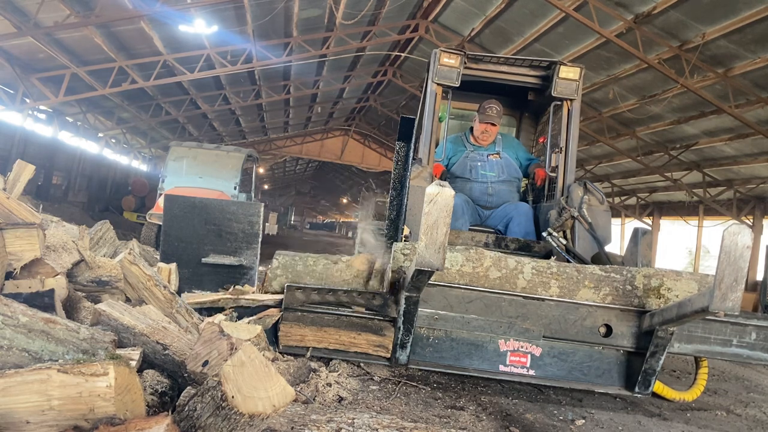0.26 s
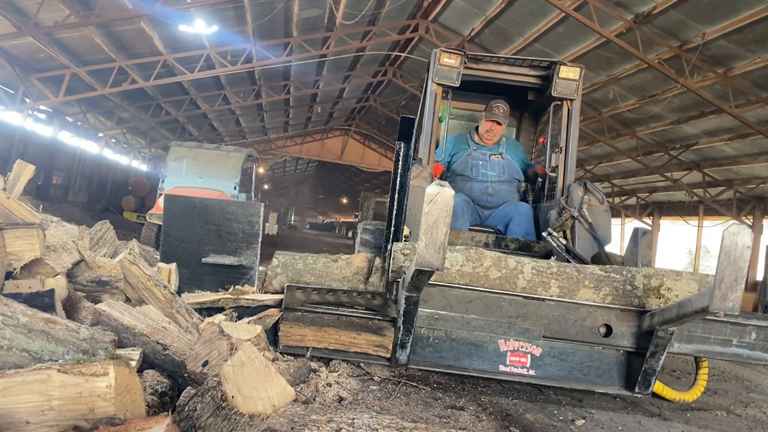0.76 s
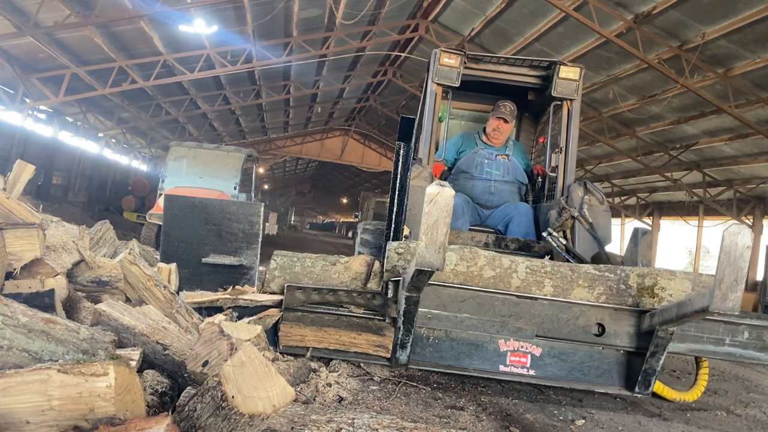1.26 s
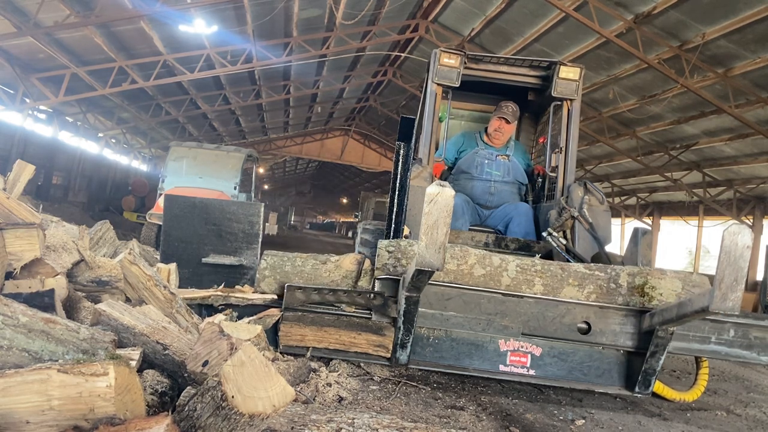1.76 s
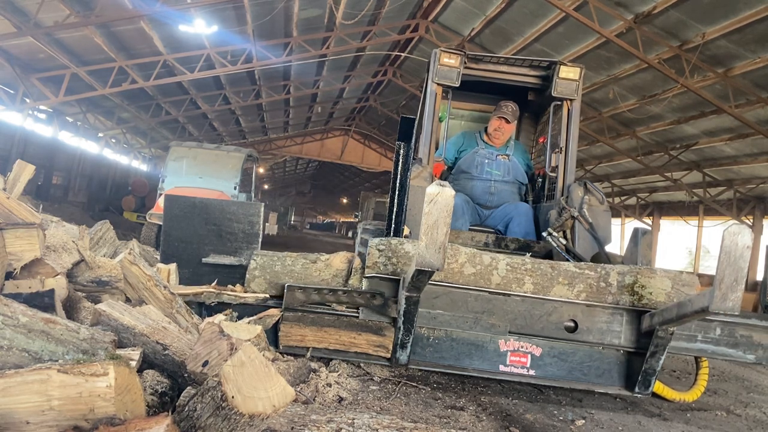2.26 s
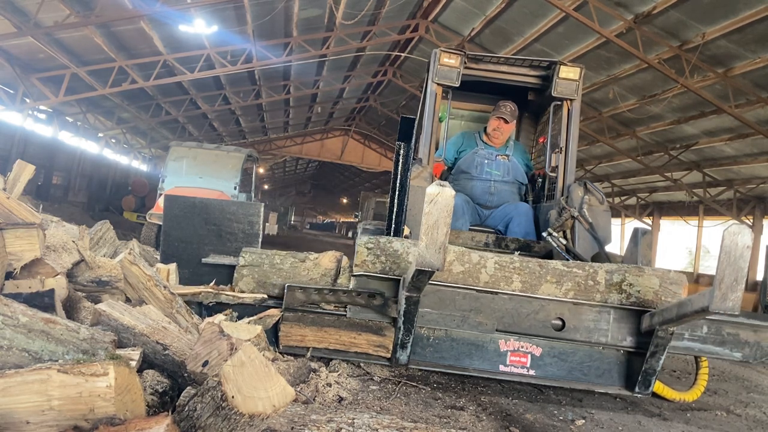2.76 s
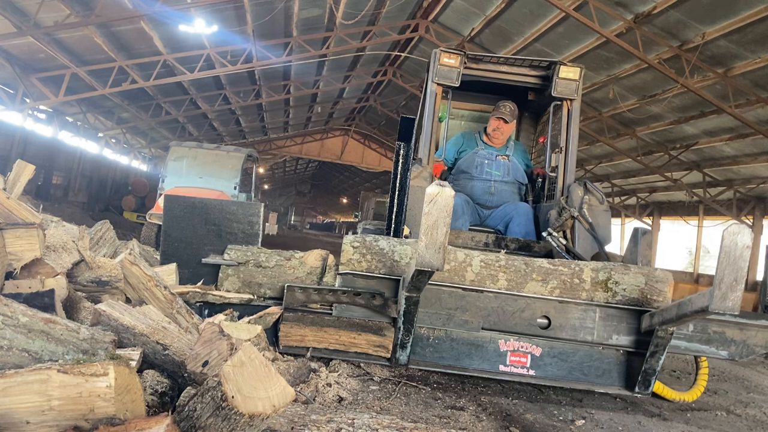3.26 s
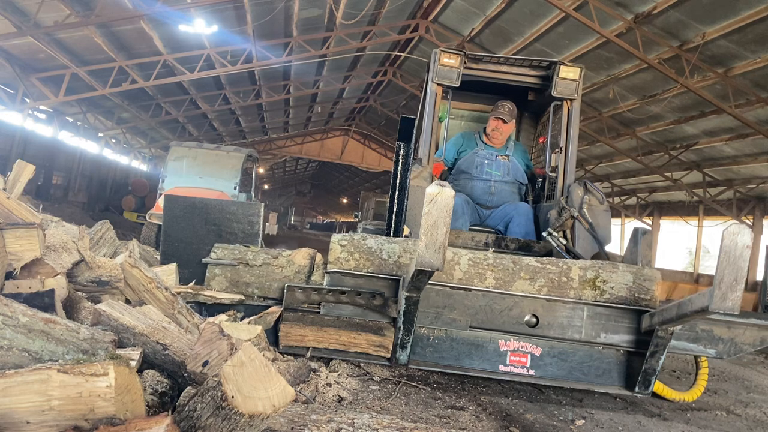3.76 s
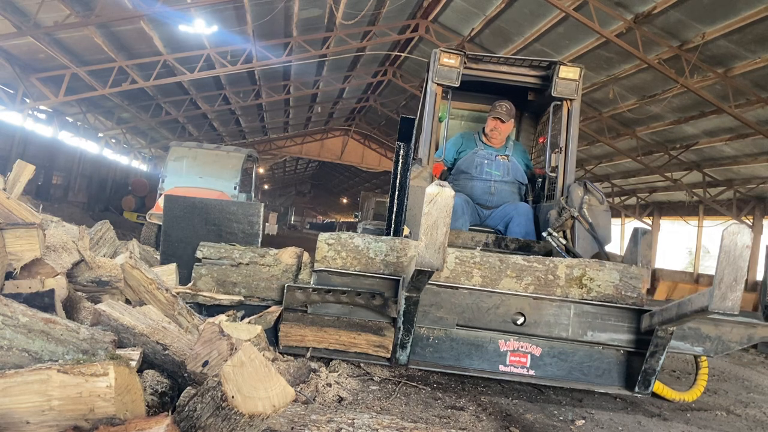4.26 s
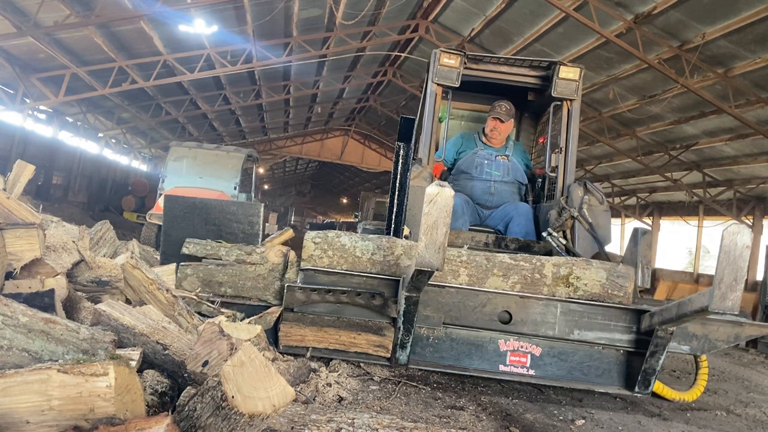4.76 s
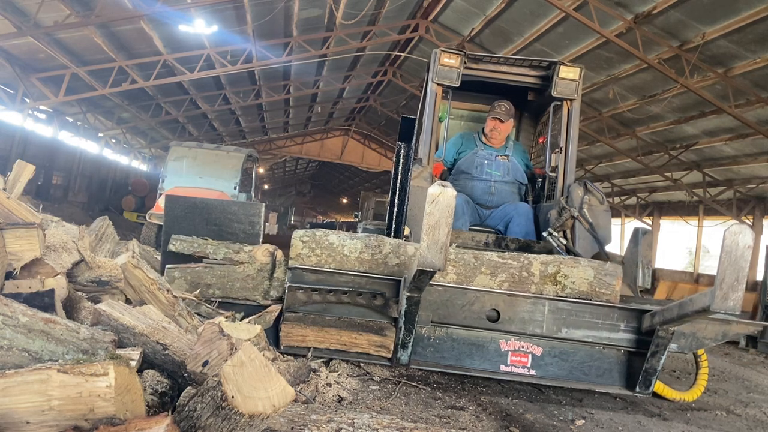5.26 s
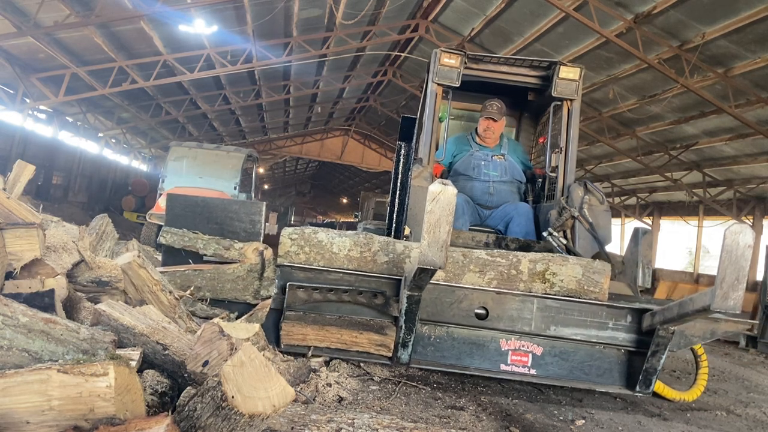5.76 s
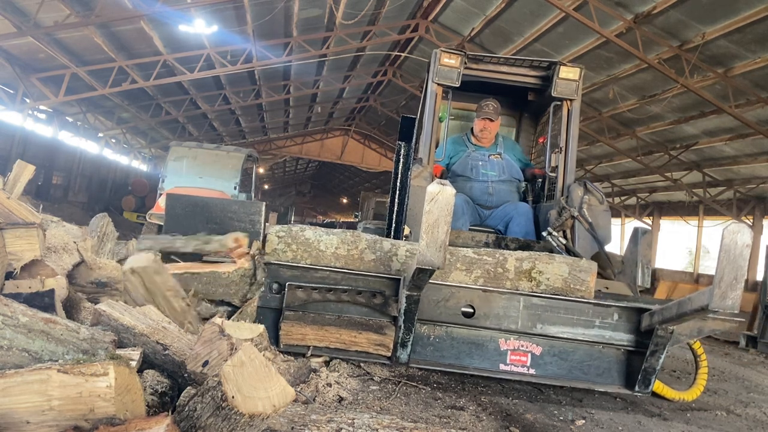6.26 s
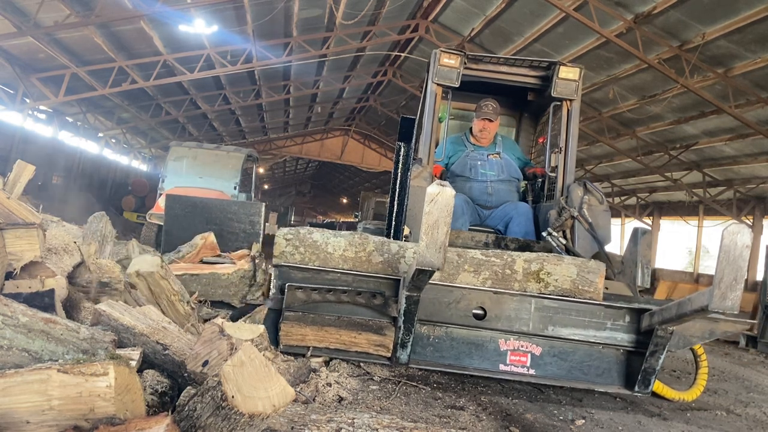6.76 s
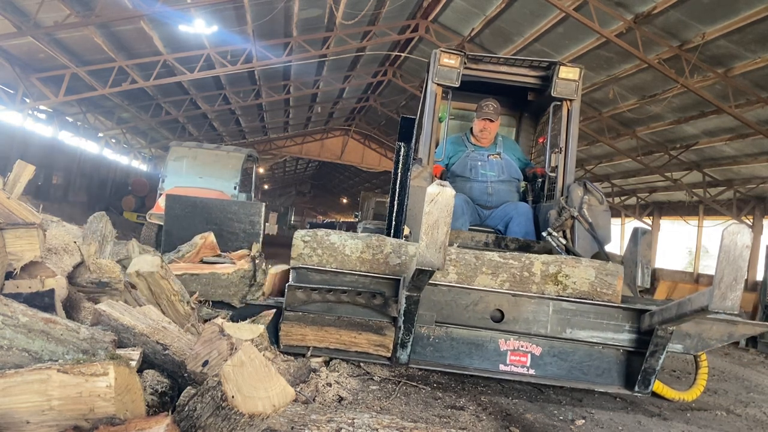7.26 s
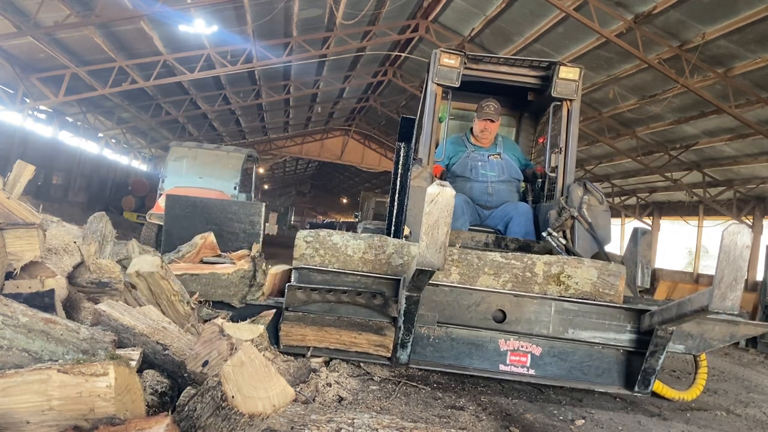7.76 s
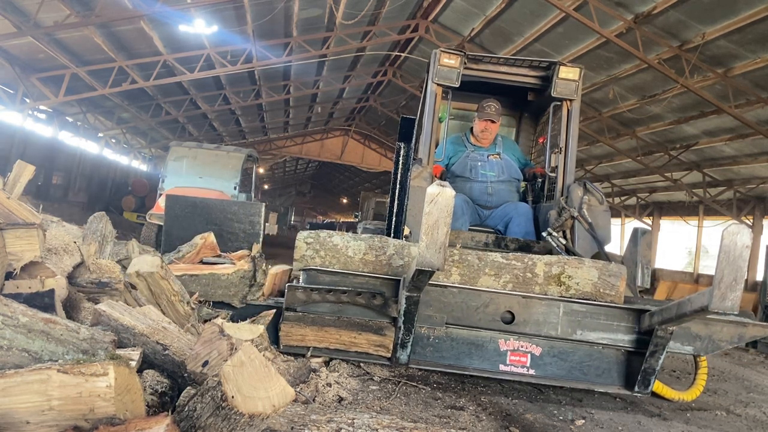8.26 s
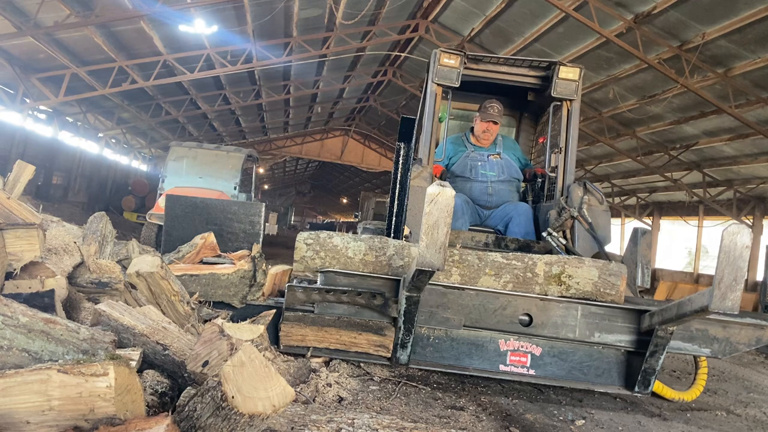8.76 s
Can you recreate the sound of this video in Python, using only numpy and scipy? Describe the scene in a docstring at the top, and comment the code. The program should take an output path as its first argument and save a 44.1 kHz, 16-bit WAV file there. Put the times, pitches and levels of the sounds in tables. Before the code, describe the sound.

A throbbing engine with faint hydraulic whine fills a metal-roofed shed. First a saw spins down with a hissing rasp; next, irregular ripping cracks, oil hiss and grinding bark accompany a splitting log. Blocks land hard. A log slides with metallic friction, followed by a cluster of hollow wooden knocks and, late on, a few more thumps. The stereo pickup is near the machine, with brief slap echoes.

```python
"""Wood splits with sharp cracks and its pieces tumble onto a pile, over a droning diesel loader in a steel shed.
At the start a saw runs down; later a log slides along a steel bed, while oil hisses and bark grinds.
The engine is a stack of tones locked to its firing, plus whines and a throbbing roar; hiss, grind and
slide are coloured noise; struck wood is short blows ringing through fast-dying modes. Shed echoes,
differences between the two stereo channels and a gain control shape the result."""
import sys
import numpy as np
from scipy import signal
from scipy.fft import rfft, irfft, next_fast_len
from scipy.io import wavfile
from scipy.ndimage import uniform_filter1d

SR = 44100
rng = np.random.default_rng(int(sys.argv[2]) if len(sys.argv) > 2 else 0)


def master_out(mix):
    """Clip the mix to full scale and print it as 16-bit PCM to the path in sys.argv[1]."""
    frames = np.transpose(np.atleast_2d(mix))
    ceiling = np.clip(frames, -1, 1)
    pcm = np.round(ceiling * 32767).astype(np.int16)
    wavfile.write(sys.argv[1], SR, pcm)


N = 397341

# how alike left and right are: f/Hz, likeness (1 = identical)
LIKENESS = [(60, 0.47), (130, 1), (290, 0.48), (640, 0.021), (1400, 0.17), (3100, 0.58), (6000, 0.28),
            (7400, 0.95), (16000, 1)]
# spells of work on the wood: full level from t/s, length/s, hiss level/dB, hiss tilt/(dB per octave),
# grind level/dB, grind weight/(dB per octave below 1 kHz)
WORK = [(0.808, 0.0084, -38.5, 7, -33, -1), (1.005, 0.14, -50, 22, -30, 12),
        (1.991, 0.22, -33.5, 6, -24.5, -0.5), (2.498, 0.084, -42, 4, -29.5, -2),
        (2.63, 0.23, -33, 4.5, -25, 4), (3.095, 0.27, -39, 1, -42, -9), (3.415, 0.13, -33, 3.5, -29, 6),
        (3.7, 0.17, -30.5, 1, -29, -12), (3.955, 0.38, -35, -1.5, -39, 6),
        (4.492, 0.086, -42.5, 5, -33.5, 16), (5.38, 0.52, -42, 4.5, -36, 19.5),
        (5.76, 0.37, -37.5, 3, -30, -2), (6.208, 0.3, -37.5, -0.5, -23, 0.5),
        (7.366, 0.52, -49, 14.5, -39.5, -5), (7.903, 0.2, -44, 1, -33, -1)]
# the saw before it surges and slows: hiss level/dB, hiss tilt/(dB per octave),
# grind level/dB, grind weight/(dB per octave below 1 kHz)
SAW = (-24.5, 2, -28.5, -14)
WORK_RISE_S, WORK_FALL_DB_PER_S = 0.013, 104.5
SAW_STOPS_S = .47
BLOW_SAMPLES = 4000  # length of the sound of one crack or landing


def amp(db):
    """Turn decibels into a plain factor."""
    return 10 ** (np.asarray(db) / 20)


def evened(x):
    """Scale a sound to rms 1."""
    return x / np.sqrt(np.mean(x ** 2) + 1e-20)


def levelled(x):
    """Scale a sound to rms 1 over its first 12 ms."""
    return x / np.sqrt(np.mean(x[:round(.012 * SR)] ** 2))


def read(points, hz):
    """Read a curve between its points, on a logarithmic pitch scale."""
    f, value = np.transpose(points)
    return np.interp(np.log(hz + 1), np.log(f + 1), value)


def curves(rows, t):
    """Join the points of each column with straight lines in time."""
    s, *columns = np.transpose(rows)
    return [np.interp(t, s, column) for column in columns]


def slowly(control):
    """Work out a control every 64 samples and join the points up."""
    t = np.arange(0, N + 64, 64) / SR
    return np.interp(np.arange(N) / SR, t, control(t))


def wander(fastest_hz, count):
    """Slow random tracks: noise of rms 1 with everything faster than the limit removed."""
    points = N // 64 + 2
    spectrum = rfft(rng.standard_normal((count, points)))
    spectrum[:, np.fft.rfftfreq(points, 64 / SR) > fastest_hz] = 0
    slow = irfft(spectrum, points)
    return [np.interp(np.arange(N) / 64, np.arange(len(row)), evened(row)) for row in slow]


def pair(left, other, hz):
    """Mix two independent spectra into a left and right as alike as the likeness curve says."""
    same = np.clip(read(LIKENESS, hz), -1, 1)
    return np.array([left, same * left + np.sqrt(1 - same ** 2) * other])


def noise(size, db_at, patchy_db):
    """Two-channel noise built frame by frame; db_at(Hz, s) sets its colour and random patches roughen it."""
    hop = size // 4
    frames, hz = N // hop + 5, np.fft.rfftfreq(size, 1 / SR)[:, None]
    a, b, c, d, patches = rng.standard_normal((frames, len(hz), 5)).T
    patches = uniform_filter1d(patches, size=size // 64, axis=0)
    patches = evened(uniform_filter1d(patches, size=8, axis=1))
    z = pair(a + 1j * b, c + 1j * d, hz)
    z *= amp(db_at(hz, np.arange(frames) * hop / SR) + patchy_db * patches)
    return signal.istft(z, nperseg=size, noverlap=size - hop)[1][:, :N]


def resonance(hz, f, width):
    """Bell-shaped peak of height 1 around one pitch."""
    return 1 / (1 + ((hz - f) / width) ** 2)


def band(low_hz, high_hz, x):
    """Keep only the sound between two pitches."""
    return signal.sosfilt(signal.butter(2, [low_hz, high_hz], "band", fs=SR, output="sos"), x)


def add(mix, s, sound):
    """Place a sound in the mix at a time in seconds."""
    part = mix[round(s * SR):][:len(sound)]
    part += sound[:len(part)]


def spell(t, start, length, rise_s, fall_db_per_s):
    """Gain that rises to full by its start time, holds, and then dies away."""
    rise = np.clip((t - start) / rise_s + 1, 0, 1)
    return rise * amp(-fall_db_per_s * np.maximum(t - start - length, 0))


def sawing(t):
    """Gain of the saw: it bites in slow surges as it slows, then dies away quickly."""
    surge_db = 2 * np.cos(2 * np.pi * 3.7 * (t - 0.04))  # 3.7 surges a second, one peaking at 0.04 s
    slowing_db = 8 * t
    dying_db = 50 * np.maximum(t - SAW_STOPS_S, 0)
    return amp(surge_db - slowing_db - dying_db)


def effort(t, column):
    """Level in dB and tilt of hiss (column 0) or grind (column 2): powers add, the loudest part sets the tilt."""
    # between spells: hiss level/dB, hiss tilt/(dB per octave), grind level/dB, grind weight/(dB per octave)
    idle = (-45, -2, -34, 0.5)
    parts = [(np.ones(len(t)), idle), (sawing(t), SAW)]
    for s, length, *row in WORK:
        parts.append((spell(t, s, length, WORK_RISE_S, WORK_FALL_DB_PER_S), row))
    power = np.array([(gain * amp(row[column])) ** 2 for gain, row in parts])
    tilt = [row[column + 1] for _, row in parts] @ power / power.sum(0)
    return 10 * np.log10(power.sum(0)), tilt


def exhaust(angle, t):
    """Exhaust and block: tones at multiples of the firing rate, meeting in one sharp pressure dip per firing."""
    # exhaust loudness: t/s, level/dB
    loudness = [(0.0, -14.5), (0.63, -12), (0.9, -10.5), (1.13, -12.5), (1.4, -8.5), (5.9, -9),
                (6.27, -13.5), (6.73, -8.5), (7.43, -8.5), (7.55, -10.5), (8.05, -11), (8.23, -11),
                (8.48, -12), (9.01, -8)]
    # tones: multiple of the firing rate, level/dB, wavering/dB
    multiples = [(.75, -41, -11.5), (1, -0.5, -0.5), (2, -10.5, 0.5), (2.75, -37, 1.5), (3, -37.5, 5),
                 (3.25, -19.5, 1.0), (4, -33.5, 7.5), (5.25, -37.5, -0.5), (6.25, -39, 8)]
    tones = 0
    for (k, db, waver_db), w in zip(multiples, wander(13, count=len(multiples))):
        tones = tones - amp(db + waver_db * w) * np.cos(k * (angle - .1) + 0.032)
    return amp(curves(loudness, t)[0]) * tones


def pumps(angle, t):
    """Pumps: two whines locked to the engine speed, which swell under strain."""
    # strain: full level from t/s, length/s, whine level/dB, upper whine level/dB
    strains = [(0, 0.53, -35.5, -42.5), (1.52, 0.17, -36, -36), (4.65, 0.89, -42, -41.5),
               (5.953, 0.42, -35, -50), (7.525, 0.6, -30, -38)]
    whine, upper = amp(-40.5), 0  # the lower whine is always there
    for s, length, db, upper_db in strains:
        gain = spell(t, s, length, rise_s=0.037, fall_db_per_s=63)
        whine = whine + gain * amp(db)
        upper = upper + gain * amp(upper_db)
    waver = amp(2.6 * wander(13, count=1)[0])
    # 6.5 and 9 cycles per firing
    return whine * waver * np.sin(6.5 * angle) + upper * np.sin(9.0 * angle)


def panels(t):
    """Sheet panels: steady low drones, each wavering in level."""
    # drones: f/Hz, level/dB
    drones = [(300, -38.5), (386, -39.5)]
    tracks = wander(9, count=len(drones))
    return sum(amp(db + 2.9 * w) * np.sin(2 * np.pi * f * t) for (f, db), w in zip(drones, tracks))


def engine():
    """Engine in the shed: exhaust tones, pump whines, droning panels, and a roar that throbs with each firing."""
    # engine speed, sagging under load: t/s, firing rate f/Hz
    speed = [(0, 74.1), (0.55, 74.7), (0.72, 76.9), (0.87, 77.2), (1.1, 73.8), (1.25, 77.4), (1.55, 79.4),
             (2.1, 78.4), (5.5, 78.6), (5.75, 77.7), (6.15, 75.0), (6.3, 75.0), (6.75, 77.9), (7.3, 78.1),
             (7.45, 77.0), (7.6, 73.0), (8.02, 72.9), (8.3, 77.1), (8.75, 78.1), (9.01, 77.9)]
    # colour of the engine noise in the shed: f/Hz, level/dB
    roar_colour = [(20, -20), (45, -37), (86, -2.5), (123, -6), (168, -11.5), (204, -3), (255, -8),
                   (345, -12.5), (434, -13.5), (1100, -21.5), (2000, -36), (4670, -46), (8000, -45),
                   (12000, -59.5), (16000, -100)]
    t = np.arange(N) / SR
    angle = 2 * np.pi * np.cumsum(curves(speed, t)[0]) / SR  # one turn per firing
    whines = pumps(angle, t) + panels(t)
    roar = evened(noise(2048, lambda f, s: read(roar_colour, f), patchy_db=1.5))
    throb = 1 + 0.069 * np.cos(angle - 1.5)
    tonal = exhaust(angle, t) + whines * amp([[1.5], [-3]])  # whines lean to the left
    return np.sqrt(2) * tonal + amp(-22.5) * throb * roar


def hiss():
    """Oil through valves, and the saw: broad noise with fuzzy whistles, sputtering across the whole band."""
    # colour of the hiss: f/Hz, level/dB
    base = [(300, -32), (1000, -23), (2200, 7.5), (3000, 3.5), (5000, 3), (8000, -0.5), (12000, -8),
            (16000, -17.5)]
    # whistles: f/Hz, width/Hz, height/dB
    whistles = [(3600, 800, 4), (6500, 200, 4)]
    # colour added while the saw runs down: f/Hz, width/Hz, height/dB
    saw_bar = [(2070, 290, -12), (3440, 1300, 2.5), (5870, 170, -1.5), (6570, 370, 0)]

    def colour(hz, s):
        whistle_db = sum(db * resonance(hz, f, width) for f, width, db in whistles)
        saw_db = sum(db * resonance(hz, f, width) for f, width, db in saw_bar)
        tilt_db = effort(s, column=0)[1] * np.log2((hz + 1) / 4000)
        return read(base, hz) + whistle_db + (s < SAW_STOPS_S + .3) * saw_db + tilt_db

    level_db = slowly(lambda t: effort(t, column=0)[0])
    sputter_db = 1.1 * wander(83, count=1)[0]
    return amp(level_db + sputter_db) * evened(noise(512, colour, patchy_db=1.5))


def grind():
    """Bark dragged and crushed: lumpy mid-range noise, its low end varying with the work."""
    # colour of the grind: f/Hz, level/dB
    base = [(150, -22.5), (400, 5.5), (900, 0), (1400, -2), (2200, -6), (5000, -13), (10000, -52)]

    def colour(hz, s):
        return read(base, hz) + effort(s, column=2)[1] * np.log2(1000 / np.clip(hz, 300, 1000))

    level_db = slowly(lambda t: effort(t, column=2)[0])
    lumps_db = 1.55 * wander(29, count=1)[0]
    return amp(level_db + lumps_db) * evened(noise(512, colour, patchy_db=2.0))


def slide():
    """The log sliding on steel: friction noise through the bed's resonances, each drifting and wavering."""
    # bed resonances: f/Hz, width/Hz, level/dB, drift/(share of pitch per s),
    # last climb/(share of pitch per s), last swell/(dB per s)
    bed = [(1200, 110, 4, 0, .03, 75), (2550, 130, -3, -.03, 0, 0), (3330, 170, 2, -.12, 0, 15),
           (4100, 150, -4, -.03, .9, 35), (6300, 90, -10, 0, .4, 0), (7800, 150, -13, 0, .4, 0),
           (10500, 180, -17, 0, .4, 0)]
    start_s, end_s = 5.35, 6.23
    climb_from_s = 6.05  # the pitches climb as the log leaves the bed
    t, wavering = np.arange(N) / SR, wander(4.9, count=2 * len(bed))

    def colour(hz, s):
        since = np.clip(s - start_s, 0, end_s - start_s)
        last = np.clip(s - climb_from_s, 0, end_s - climb_from_s)
        w = [np.interp(s, t, row) for row in wavering]
        total = 0
        for k, (f, width, db, drift, climb, swell_db) in enumerate(bed):
            pitch = f * (1 + drift * since + climb * last + .018 * w[2 * k + 1])
            level = amp(db + swell_db * last + 1.5 * w[2 * k])
            total = total + level * resonance(hz, pitch, width)
        return 20 * np.log10(total)

    stroke = spell(t, start_s, end_s - start_s, rise_s=0.035, fall_db_per_s=302)
    z = noise(1024, colour, patchy_db=2.2) * stroke
    z = z / np.sqrt((z ** 2).sum() / (2 * stroke ** 2).sum())  # rms 1 during the stroke
    return amp(-32 + 2 * (t - start_s)) * z  # grows 2 dB per s


def ring(hz, blow, slower, sag=0):
    """Wood's modes driven by an uneven blow and dying fast; sag lets the pitch sink. Peak 1."""
    # modes: multiple of the pitch, level/dB, time to fall 60 dB/s (before "slower" stretches it)
    modes = [(1, 0, .014), (1.22, -9, .008), (.75, -8, .01), (2.6, -13, .004)]
    t = np.arange(len(blow)) / SR
    # a sagging pitch starts high and sinks with an 18 ms time constant
    turns = np.cumsum(hz * (1 + sag * (np.exp(-t / .018) - .5))) / SR
    sound = 0
    for k, db, t60 in modes:
        turn = np.exp(2j * np.pi * k * turns)
        keep = amp(-60 / (slower * t60 * SR))  # share left after each sample
        sound = sound + amp(db) * (turn * signal.lfilter([1], [1, -keep], blow / turn)).imag
    return sound / abs(sound).max()


def scatter(gain, per_s, hz_range, spread_db, slower):
    """Small pieces struck at random: 12 sizes, each with its own pitch."""
    loudness = amp(spread_db * np.minimum(rng.exponential(1, N), 4))
    sizes = gain * loudness * (rng.random(N) < per_s / SR)
    piece = rng.integers(0, 12, N)
    blows = rng.standard_normal((12, 1000)) * amp(-60 * np.arange(1000) / SR / .01)
    out = np.zeros(N)
    for k, hz in enumerate(np.geomspace(*hz_range, 12)):
        sound = ring(hz, blows[k], slower)
        for at in np.flatnonzero(sizes * (piece == k) > 1e-4):
            add(out, at / SR, sizes[at] * sound)
    return out


def sharp_strike():
    """One single-sample strike after 1 ms, 22 dB above the rms of the raw noise it joins."""
    return amp(22) * (np.arange(BLOW_SAMPLES) == round(.001 * SR))


def landings():
    """Pieces landing on the pile: dull, longer blows; low-pitched pieces ring longer."""
    # landings: t/s, peak level/dB, f/Hz
    thumps = [(0.849, -17, 600), (1, -18, 230), (1.005, -25, 585), (1.046, -19, 1190), (1.089, -13, 232),
              (1.12, -23, 1160), (2.185, -8, 794), (2.727, -7, 245), (4.167, -4.5, 615), (4.178, -9, 494),
              (4.189, -18, 560), (4.209, -12.5, 520), (4.227, -12, 537), (4.297, -2.5, 890),
              (4.298, -2, 504), (6.059, -3, 140), (6.072, -24, 300), (6.267, -4.5, 324), (6.315, -9, 323),
              (6.224, -27, 500), (6.288, -5, 473), (6.268, -16, 830), (6.352, -3.5, 770),
              (6.385, -6.5, 330), (6.464, -7, 860), (6.515, -12, 610), (6.572, -8, 320), (6.345, -10, 328),
              (6.44, -14, 413), (6.49, -5.5, 330), (6.468, -4, 326), (6.514, -6, 347), (7.938, -2.5, 223),
              (8.073, -5, 400), (8.084, -4.5, 740), (8.098, -6, 446)]
    out, t = np.zeros(N), np.arange(BLOW_SAMPLES) / SR
    for s, db, hz in thumps:
        blow = rng.standard_normal(BLOW_SAMPLES) * amp(-60 * t / 0.079) + sharp_strike()
        add(out, s, amp(db) * ring(hz, blow, slower=max(1100 / hz, 1)))
    return out


def clatter():
    """Pieces clattering down the pile: random knocks at many pitches."""
    # tumbles: full level from t/s, length/s, level/dB
    tumbles = [(1.0, .12, -33), (6.24, .31, -24), (8.07, .08, -27)]
    falling = slowly(lambda u: sum(
        spell(u, s, length, WORK_RISE_S, 200) * amp(db) for s, length, db in tumbles))
    return scatter(falling, per_s=300, hz_range=(310, 1350), spread_db=2.6, slower=1.5)


def splinters():
    """Small random snaps while wood is worked or sawn, following the level of the hiss."""
    def working(u):
        total = amp(SAW[0] - 12) * sawing(u)  # the saw's chips are fainter
        for s, length, db, *_ in WORK:
            total = total + spell(u, s, length, WORK_RISE_S, WORK_FALL_DB_PER_S) * amp(db)
        return total

    return scatter(slowly(working) * amp(5), per_s=260, hz_range=(1100, 3900), spread_db=2.3, slower=0.88)


def cracks():
    """Fibres snapping: a burst of tearing noise and the ringing log, its pitch sinking as the split opens."""
    # cracks: t/s, snap peak level/dB, ring level/dB, ring f/Hz, top-end level/dB
    snaps = [(0.812, -17, -27.5, 1410, -30), (0.995, -20.5, -23.5, 905, -42), (0.999, -24, -34, 1520, -52),
             (1.076, -16.5, -37, 1640, -47), (1.11, -17.5, -28, 1180, -52), (1.9927, -19, -43, 1070, -42),
             (2.001, -19, -37, 1100, -32), (2.048, -29, -23.5, 1290, -39), (2.1985, -12, -35, 1000, -50),
             (2.1845, -7, -19.5, 1660, -42), (2.4744, -27, -31, 907, -32.5), (2.512, -17, -27, 1005, -31.5),
             (2.5445, -16, -30, 950, -40), (2.635, -14, -24, 910, -27), (2.7312, -5, -14.5, 880, -25),
             (2.745, -9, -18, 890, -24), (2.762, -16, -16, 950, -39), (2.8296, -16, -21.5, 1040, -36),
             (2.8475, -18, -30, 1010, -38), (2.935, -18, -31, 990, -33), (3.013, -21.5, -28.5, 880, -38),
             (3.1063, -13, -34, 907, -26), (3.171, -19.5, -33, 1200, -45), (3.259, -23, -28.5, 2000, -35.5),
             (3.4178, -10, -16.5, 1100, -26.5), (3.4542, -18, -18.5, 1150, -27),
             (3.483, -10, -22, 1260, -29), (3.5236, -18, -41, 1100, -42), (3.6693, -20, -26.5, 1090, -35),
             (3.7205, -1, -9, 1110, -20.5), (3.7943, -9, -31, 916, -29), (3.854, -15.5, -30, 1210, -42),
             (3.962, -13, -13, 1190, -26), (4.0362, -10, -24.5, 1170, -29), (4.0874, -31, -41, 1050, -39),
             (4.156, -26, -23, 1270, -51), (4.1622, -18, -19, 1110, -35), (4.175, -15, -27, 1320, -43),
             (4.187, -17.5, -19.5, 1100, -46), (4.2842, -0.5, -11, 1104, -19),
             (4.4837, -35, -29.5, 1030, -45), (4.496, -24.5, -28, 990, -43), (5.119, -34, -44, 1010, -42),
             (5.201, -42, -33, 1080, -39.5), (5.41, -21.5, -13, 1020, -28.5), (5.589, -26, -32, 900, -36),
             (5.767, -12, -12, 1060, -30.5), (6.0543, -23, -22, 1100, -29.5), (6.2024, -22, -39, 1440, -31),
             (6.2395, -12, -20.5, 1130, -38), (6.3392, -10, -21, 1300, -42), (6.359, -29, -26, 1150, -54),
             (6.403, -26, -30, 1310, -43), (6.4501, -11.5, -23.5, 1100, -32),
             (6.5193, -10, -19.5, 1010, -55), (7.9137, -16.5, -23.5, 1260, -52),
             (8.038, -37, -34, 1100, -50), (8.066, -36, -20, 870, -47)]
    out, t = np.zeros(N), np.arange(BLOW_SAMPLES) / SR
    bursts, strike = rng.standard_normal((len(snaps), BLOW_SAMPLES)), sharp_strike()
    middle = band(2200, 3900, bursts + .5 * strike)
    top = band(5000, 11000, bursts)
    # fibres go on parting after the snap, raggedly, in steps of about 2 ms
    ragged = amp(5 * np.repeat(rng.standard_normal((len(snaps), 40)), 100, axis=1))
    tear = amp(-19 - 60 * t / 0.1) * ragged
    snap = amp(-60 * t / .01)
    start = np.minimum(t / .0008, 1)
    middle = middle * start * (snap + tear)
    top = top * start * (snap + amp(-9) * tear)
    knock = np.minimum(t / .0015, 1) * amp(-60 * t / .055)
    for (s, db, body_db, hz, top_db), burst, m, h in zip(snaps, bursts, middle, top):
        add(out, s, amp(db) * m / abs(m).max() + amp(top_db) * levelled(h))
        body = ring(hz, burst * knock + strike, slower=1, sag=.33)
        add(out, s, amp(body_db) * levelled(body))
    return out


def wood():
    """The splitting log and the pile, both thinned below 130 Hz."""
    both = [cracks() + splinters(), landings() + clatter()]
    return signal.sosfilt(signal.butter(2, 130, "high", fs=SR, output="sos"), both)


def shed(x, echo_db):
    """Shed walls: a few near echoes, then sparse taps of random sign, each band dying at its own speed."""
    # near echoes: t/s, left level/dB, right level/dB (echo_db is added)
    echoes = [(.0045, -15, -13), (.0104, -5, -6), (.0165, -13, -15), (.021, -12, -11), (.028, -16, -14)]
    # how long the shed rings: f/Hz, time to fall 60 dB/s
    decay = [(200, 0.39), (800, 0.48), (2000, 0.4), (5500, 0.06), (12000, 0.02)]
    taps = np.zeros((2, SR))
    at = np.arange(600, SR - 20, 20) + rng.integers(0, 20, (2, (SR - 601) // 20))
    np.put_along_axis(taps, at, rng.choice([-1., 1.], at.shape), 1)
    hz, t, (left, other) = signal.stft(taps, SR, nperseg=256)
    hz = hz[:, None]
    z = pair(left, other, hz) * amp(-60 * t / read(decay, hz))
    tail = signal.istft(z, SR, nperseg=256)[1]
    tail *= amp(-15) / np.linalg.norm(tail[0])
    tail[:, 0] = 1  # the direct sound
    for s, left_db, right_db in echoes:
        tail[:, round(s * SR)] += amp([left_db, right_db]) * amp(echo_db)
    return signal.fftconvolve(x[None], tail, axes=1)[:, :N]


def scene():
    """Engine, oil and wood under one roof; the pile lies away from the walls that throw the cracks back."""
    splitting, pile = wood()
    machine = engine() + hiss() + slide() + grind()
    return machine + shed(splitting, echo_db=0) + shed(pile, echo_db=-12)


def record(dry):
    """Stereo phase and balance, gain control that ducks around loud sounds, soft clipping, band limit."""
    # stereo phase, stepping by half turns above 7.6 kHz: f/Hz, left lead over right/radians
    lead = [(0, 0), (80, -.17), (340, -.6), (3190, .9), (4650, .2), (7600, 0), (8400, -np.pi),
            (9600, -np.pi), (10500, -2 * np.pi), (11700, -2 * np.pi), (12500, -3 * np.pi),
            (13700, -3 * np.pi), (14300, -4 * np.pi), (16000, -4 * np.pi)]
    # stereo balance: f/Hz, left above right level/dB
    lean = [(60, 0.1), (150, -1), (380, -1.5), (950, -4), (2380, 1), (5980, 2), (15000, -1)]
    size = next_fast_len(N)
    hz = np.fft.rfftfreq(size, 1 / SR)
    # the top end falls away above 10 kHz, with a slight dip at 5.7 kHz
    tone_db = -9.0 * np.clip(np.log2((hz + 1) / 10000), 0, 1) - 0.46 * resonance(hz, 5700, 500)
    half = amp(read(lean, hz) / 2) * np.exp(.5j * read(lead, hz))  # each channel takes half the difference
    stereo = irfft(rfft(dry, size) * [half, 1 / half] * amp(tone_db), size)[:, :N]
    power_db = 10 * np.log10(abs(uniform_filter1d((stereo ** 2).mean(0), size=565)) + 1e-12)
    fall = np.arange(N) * 3.4 / SR  # the held peak level sinks 3.4 dB per s
    held_db = np.maximum.accumulate(power_db + fall) - fall
    over_db = np.maximum(held_db + 6.5, 0)  # above a threshold of -6.5 dB
    ducked = stereo / amp(1.24 * uniform_filter1d(over_db, size=200))
    soft = .95 * np.tanh(ducked / .95)
    soft = soft - soft.mean(axis=1, keepdims=True)
    lowpass = signal.firwin(511, 16300, window=("kaiser", 9), fs=SR)
    return signal.oaconvolve(soft, lowpass[None], "same")


dry = scene()
out = record(dry)
master_out(out)
```